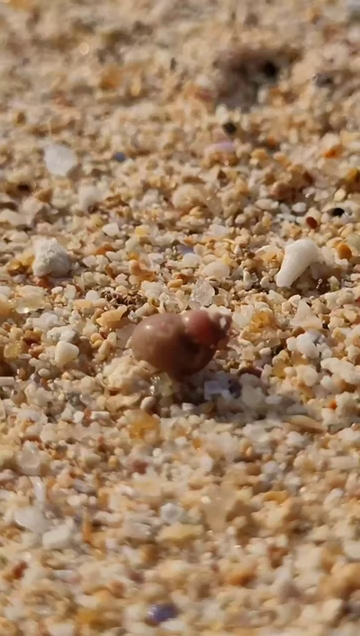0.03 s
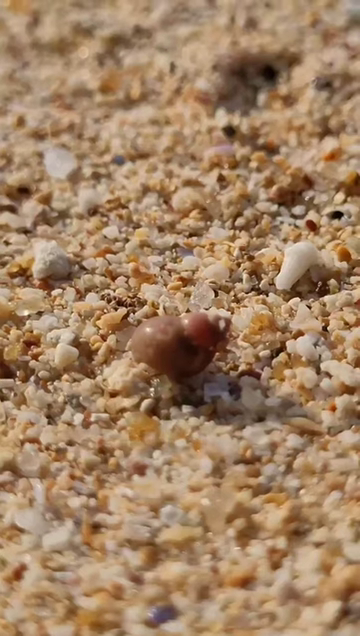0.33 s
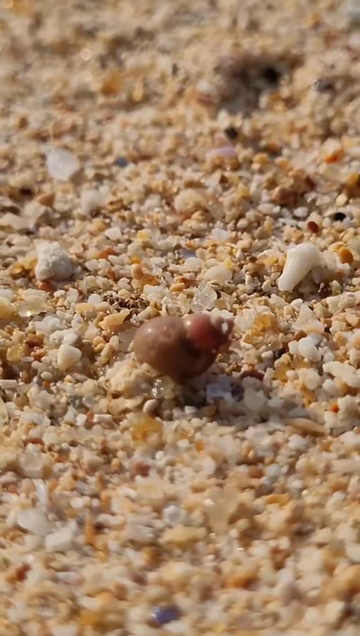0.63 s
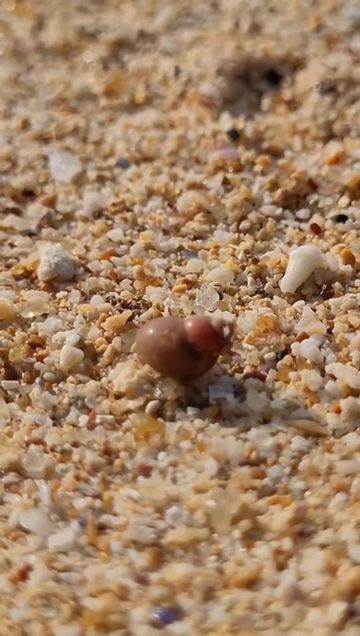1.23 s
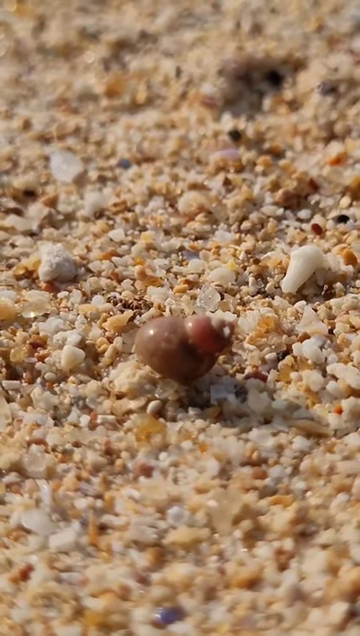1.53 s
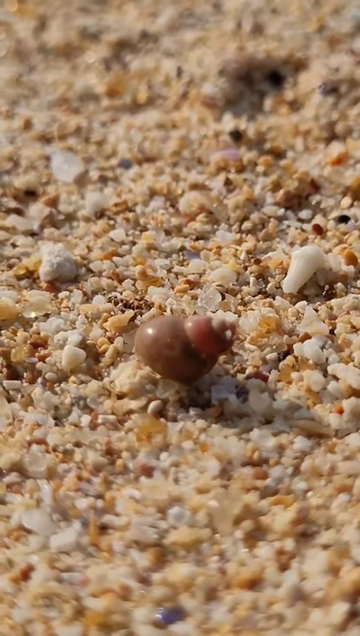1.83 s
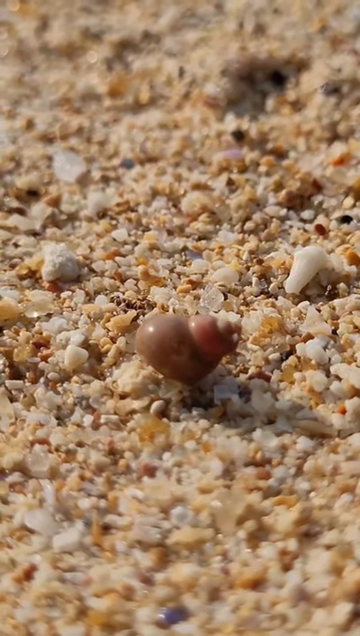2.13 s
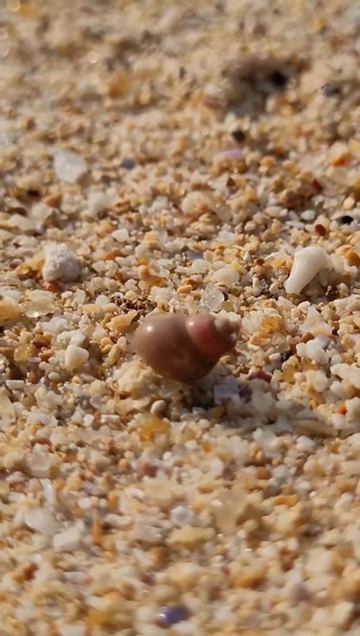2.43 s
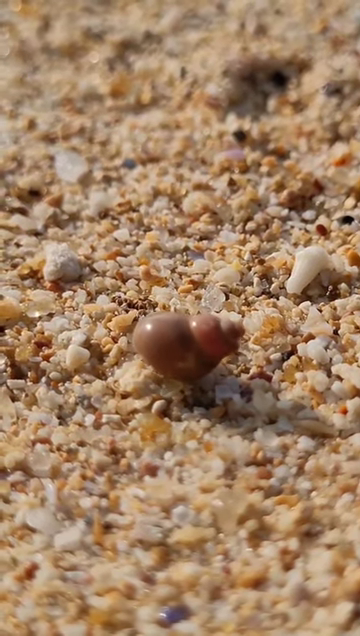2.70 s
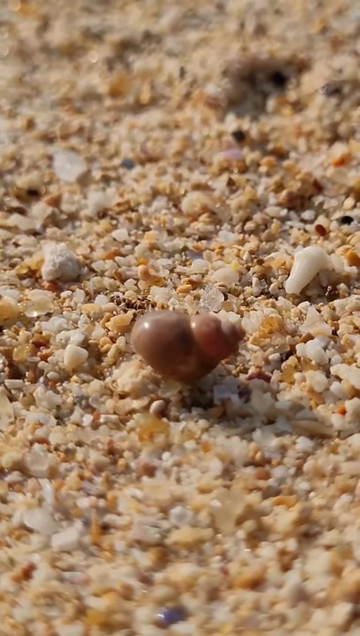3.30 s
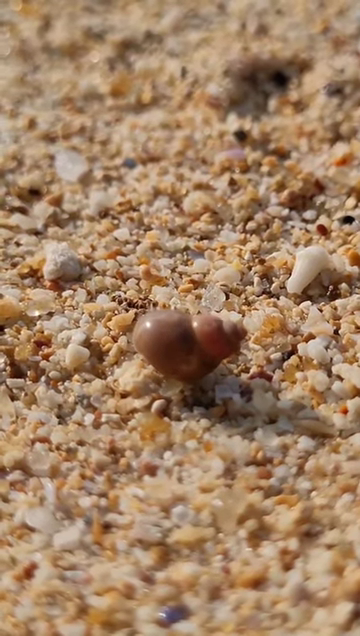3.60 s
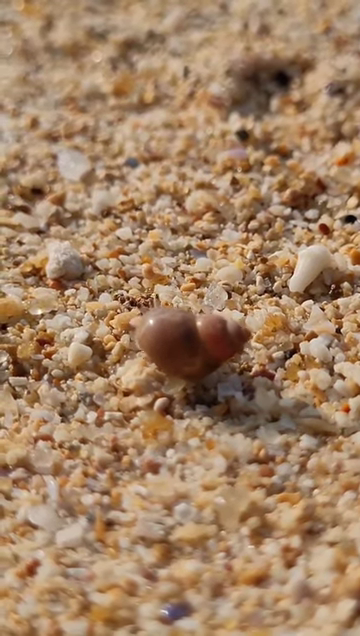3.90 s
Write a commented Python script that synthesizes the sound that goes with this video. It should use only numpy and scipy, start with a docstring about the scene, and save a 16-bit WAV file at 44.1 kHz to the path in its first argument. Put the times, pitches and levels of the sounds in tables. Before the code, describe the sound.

Gusty wind rumbling and buffeting the microphone on a beach, with faint distant surf.

```python
"""A hard draught buffets the left ear, then gives way to a gusty breeze on a beach.
The wind is heard close to the sand, through the two ports of a small microphone: each passing
eddy changes the pressure on a port, so the air rumbles, thuds, hoots and flaps as it rises and falls.
Distant surf washes and hisses behind it, and something small ticks once."""
import sys
import numpy as np
from scipy import signal
from scipy.fft import rfft, irfft, next_fast_len
from scipy.io import wavfile
from scipy.ndimage import uniform_filter1d

SR = 44100
rng = np.random.default_rng(int(sys.argv[2]) if len(sys.argv) > 2 else 0)


def unload_wav(signal):
    """Save mono or channel-first audio to the path in sys.argv[1] as 16-bit WAV at rate SR, clipped to [-1, 1]."""
    wavfile.write(
        sys.argv[1],
        SR,
        np.round(np.clip(np.atleast_2d(signal).T, -1, 1) * 32767).astype(np.int16),
    )


N = 174195

# Levels in all tables are relative.
# Strength of the breeze: t/s, level/dB
BREEZE_STRENGTH = [(.19, -33), (.255, -31), (.29, -23), (.35, -29), (.5, -30), (.55, -25), (.62, -31),
                   (.78, -28), (.85, -31), (.92, -27), (1.03, -30), (1.25, -28), (1.38, -31), (1.55, -29),
                   (1.7, -35), (1.95, -36.5), (2.05, -30), (2.2, -30.5), (2.3, -33), (2.41, -31),
                   (2.57, -35.5), (2.72, -31), (2.88, -31), (3.04, -28.5), (3.14, -25), (3.22, -29),
                   (3.46, -26.5), (3.52, -31.5), (3.7, -29), (3.77, -34), (3.85, -31)]
# Spectrum of its turbulence: f/Hz, level/dB
BREEZE_SPECTRUM = [(20, -23), (32, -19), (52, 6.5), (85, -1.5), (130, 2.5), (190, -4), (270, 0),
                   (410, -2.5), (600, -7.5), (800, -17.5), (1200, -31), (2000, -46), (3200, -56.5),
                   (6000, -91)]
# Small eddies against large ones: t/s, level/dB
SMALL_EDDY_BALANCE = [(.2, 0.5), (.9, 2), (1.24, 4), (1.45, 2.5), (1.9, 1.5), (2.05, 4.5), (2.42, -1.5),
                      (2.6, 2.5), (3.1, 8), (3.33, 9.5), (3.66, 4), (3.92, 10)]
# Spectrum of a sharp little eddy: f/Hz, level/dB
FLICK_SPECTRUM = [(120, -14.5), (400, 10), (750, -3.5), (1200, -15.5), (2000, -26), (3200, -44),
                  (6000, -68.5)]
# Strength of the draught: t/s, level/dB
DRAUGHT_STRENGTH = [(.19, -17), (.25, -14), (.33, -13), (.372, -15), (.382, -22), (.41, -15), (.45, -14.5),
                    (.505, -16), (.56, -12.5), (.63, -15), (.71, -15.5), (.75, -14), (.812, -14),
                    (.84, -40)]
# Spectrum of its turbulence: f/Hz, level/dB
DRAUGHT_SPECTRUM = [(20, -35), (40, -20), (60, -1), (120, 0.5), (240, 3), (340, -2.5), (560, -14),
                    (850, -25), (1350, -47), (2500, -48), (5000, -85)]
# Swell of the surf's hiss: t/s, level/dB
SURF_SWELL = [(.2, -59), (.55, -60.5), (.8, -61.5), (.95, -63.5), (1.15, -63), (1.4, -64), (1.85, -66),
              (2.1, -63), (2.45, -62.5), (2.75, -60), (3.0, -59.5), (3.3, -63), (3.92, -62.5)]
# Spectrum of the surf: f/Hz, level/dB
SURF_SPECTRUM = [(60, 28.5), (300, 18.5), (700, 0.5), (1300, 0), (2000, -6), (3100, -13.5), (3600, -11.5),
                 (4050, -8), (4700, -13.5), (5500, -12.5), (6400, -15.5), (7400, -14.5), (9800, -16.5),
                 (11000, -20), (12500, -15), (14500, -27)]
# Large eddies on the ports: t/s, crest level/dB, half length/s, left minus right/dB
THUD_EVENTS = [(.197, -26, .01, 20), (.548, -16, .014, 9), (.592, -22, .012, 18), (.737, -20, .014, 12),
               (.768, -23, .011, 16), (.806, -23, .01, 12), (1.078, -26, .009, 8), (1.158, -30, .014, 0),
               (1.335, -31, .016, 0), (1.466, -27, .014, 2), (1.535, -33, .016, -3), (1.907, -28, .007, -6),
               (2.054, -29, .009, -14), (2.16, -33, .018, -6), (2.402, -28, .01, -14),
               (2.425, -25, .012, 2), (2.632, -30, .02, -7), (2.708, -30, .014, -5), (2.779, -25, .011, -5),
               (2.845, -28, .008, 4), (2.913, -19.5, .009, 1), (3.015, -30, .009, -2), (3.08, -25, .011, 3),
               (3.106, -18.5, .01, -5), (3.14, -25, .011, 3), (3.335, -29, .022, 2), (3.45, -27, .018, -5),
               (3.67, -21.5, .01, 2)]
# Vortices across the ports: t/s, crest level/dB, half length/s, f/Hz, left minus right/dB
VORTEX_EVENTS = [(.228, -19, .008, 390, 22), (.244, -21, .008, 380, 22), (.268, -19, .012, 470, 12),
                 (.362, -20, .011, 320, 22), (.448, -25, .012, 430, 18), (.545, -17, .01, 280, 6),
                 (.574, -17, .011, 370, 18), (.614, -24, .007, 520, 18), (.655, -21, .011, 270, 20),
                 (.68, -20, .009, 300, 22), (.802, -20, .013, 245, 20), (.936, -24, .008, 240, -8),
                 (1.178, -23, .008, 330, -3), (1.24, -26, .012, 580, 0), (1.283, -22, .008, 430, -4),
                 (1.316, -18, .009, 255, -4), (1.338, -24, .008, 270, -3), (1.42, -24, .008, 225, -4),
                 (1.456, -22, .016, 280, 2), (1.906, -21.5, .005, 310, -1), (2.056, -23.5, .01, 490, -4),
                 (2.152, -24, .013, 240, -2), (2.398, -23, .011, 450, -3), (2.775, -20, .007, 270, -3),
                 (2.843, -20, .008, 380, 2), (2.911, -16.5, .007, 330, 0), (2.957, -18, .007, 365, 0),
                 (2.98, -13, .007, 400, 1), (3.083, -18, .009, 315, 0), (3.114, -14.5, .011, 340, -1),
                 (3.14, -19.5, .008, 480, -2), (3.198, -16.5, .008, 270, -7), (3.238, -17.5, .009, 300, -3),
                 (3.292, -15.5, .009, 520, -1), (3.315, -23, .009, 540, -5), (3.379, -17, .009, 470, 1),
                 (3.438, -19, .009, 420, -1), (3.474, -22, .007, 490, 3), (3.609, -20.5, .008, 420, -4),
                 (3.663, -20.5, .011, 330, -4), (3.823, -25, .007, 370, -3)]
# Flaps of air: t/s, crest level/dB, left minus right/dB
FLAP_EVENTS = [(.228, -22, 14), (.449, -22, 14), (.615, -22, 14), (2.13, -27, 2), (2.27, -27, 3),
               (2.402, -24, -4), (2.774, -22, 0), (2.908, -19, 1), (3.125, -19, 0), (3.195, -21, -2),
               (3.31, -22, -2), (3.359, -24, 2), (3.472, -23, 2), (3.54, -25, 3), (3.61, -24, 1)]
# Spectrum of the tick: f/Hz, level/dB
TICK_SPECTRUM = [(500, -14), (2200, -1), (4000, 0), (6500, -6), (10000, -6), (12000, -18)]


def undb(db):
    """Amplitude ratio: tenfold for every 20 dB."""
    return 10 ** (np.asarray(db) / 20)


def curve(rows):
    """Linear interpolation through (t/s, value) rows."""
    return np.interp(np.arange(N) / SR, *np.array(rows).T)


def pan(db):
    """Left and right gains for a level difference, left minus right."""
    return undb(np.array([[db], [-db]]) / 2)


def unit(x):
    """Normalisation to rms 1."""
    return x / np.sqrt(np.mean(x ** 2, axis=-1, keepdims=True))


def colour(x, spectrum):
    """Spectral shaping by (f/Hz, level/dB) rows, falling 12 dB an octave below the first."""
    hz, db = np.array(spectrum).T
    size = 2 * next_fast_len(N)
    f = np.maximum(np.fft.rfftfreq(size, 1 / SR), 1)
    gain = undb(np.interp(np.log(f), np.log(hz), db)) * np.minimum(f / hz[0], 1) ** 2
    return irfft(rfft(x, size) * gain)[..., :N]


def split(x, hz):
    """Complementary filtering: the parts below and above a frequency."""
    low = signal.sosfiltfilt(signal.butter(2, hz, fs=SR, output="sos"), x)
    return low, x - low


def wander(rate_hz):
    """Smooth random modulation of rms 1, its extremes rounded off."""
    step = int(SR / rate_hz)
    held = np.repeat(rng.standard_normal(N // step + 2), step)
    smooth = uniform_filter1d(uniform_filter1d(held, step), step)[:N]
    return unit(np.tanh(smooth / 2))


def burst(hz, width, half_s, count=8192):
    """A wave packet on each port: noise of bandwidth width * hz in a Gaussian window, crest rms near 1."""
    f = np.maximum(np.fft.rfftfreq(count, 1 / SR), 1)
    resonance = 1 / np.hypot(1, (f / hz - hz / f) / width)
    rolloff = 1 + (f / (1.876 * hz)) ** 5
    band = irfft(rfft(rng.standard_normal((2, count))) * resonance / rolloff)
    window = np.exp(-((np.arange(count) - count // 2) / SR / half_s) ** 2)
    return unit(band * window) * np.sqrt(np.mean(window ** 2))


def add(out, sound, at):
    """Superposition of a short sound, centred on a time."""
    first = int(at * SR) - sound.shape[1] // 2
    out[:, first:first + sound.shape[1]] += sound[:, :N - first]


def turbulence(spectrum, eddies_per_s, eddy_share, flutter_hz, crackle_db, crossover_hz=599):
    """Turbulent pressure on a port, as large and small eddies; intermittency bunches the small ones."""
    hits = (rng.random(N) < eddies_per_s / SR) * rng.standard_normal(N)
    churn = rng.standard_normal(N)
    pressure = np.sqrt(eddy_share) * unit(hits) + np.sqrt(1 - eddy_share) * churn
    flutter = undb(1.5 * wander(flutter_hz))
    large, small = split(unit(colour(pressure * flutter, spectrum)), crossover_hz)
    return large, small * unit(undb(crackle_db * wander(220)))


def flicks(per_s=45, spread_db=5.5):
    """Shot noise: lone, sharp eddies kick one port at random times, with random size and sign."""
    chance, strength, polarity = rng.random((3, N))
    kicks = undb(spread_db * np.sqrt(12) * strength) * np.sign(polarity - .5)
    return unit(colour((chance < per_s / SR) * kicks, FLICK_SPECTRUM))


def breeze(left_cut_hz=270):
    """Shared gusts modulate independent turbulence on each port; the left is thin, the right rumbles."""
    gusts_db = curve(BREEZE_STRENGTH) + 1.05 * wander(45)
    ports = [turbulence(BREEZE_SPECTRUM, eddies_per_s=300, eddy_share=.54, flutter_hz=120, crackle_db=7)
             for _ in range(2)]
    large, small = np.stack(ports, axis=1)
    bass_cut = signal.butter(4, left_cut_hz, "highpass", fs=SR, output="sos")
    large[0] = signal.sosfilt(bass_cut, large[0])
    crackle = undb(-.5) * small + undb(-14) * np.stack([flicks(), flicks()])
    crackle *= undb(curve(SMALL_EDDY_BALANCE))
    return undb(gusts_db + 2.5) * (large * pan(.5) + crackle * pan(4))


def draught():
    """Dense turbulent pressure buffets the left port alone, then stops abruptly."""
    large, small = turbulence(DRAUGHT_SPECTRUM, eddies_per_s=1200, eddy_share=.4,
                              flutter_hz=110, crackle_db=4)
    blowing = np.arange(N) / SR < DRAUGHT_STRENGTH[-1][0]
    left = (large + small) * undb(curve(DRAUGHT_STRENGTH) + 1.5) * blowing
    return np.stack([left, np.zeros(N)])


def surf(hiss_hz=3500, foam_hz=7400):
    """Uncorrelated noise left and right makes a wide wash; its top fizzes more as each wave spreads."""
    wash = colour(rng.standard_normal((2, N)), SURF_SPECTRUM)
    _, hiss = split(wash, hiss_hz)
    body, foam = split(wash / np.std(hiss), foam_hz)
    swell_db = curve(SURF_SWELL)
    fizz = undb(-5 + .082 * (swell_db - swell_db.min()))
    return (body + foam * fizz) * undb(swell_db + 2.5 + .37 * wander(4.86)) * pan(-2.15)


def thuds():
    """Large eddies change the pressure slowly: dull, low pushes of a cycle or two."""
    out = np.zeros((2, N))
    for at, db, half_s, side_db in THUD_EVENTS:
        add(out, burst(hz=103, width=1, half_s=half_s) * undb(db + 2) * pan(side_db), at)
    return out


def vortices():
    """Vortices hoot briefly across the ports; a narrow bandwidth gives each a hollow pitch."""
    out = np.zeros((2, N))
    for at, db, half_s, hz, side_db in VORTEX_EVENTS:
        add(out, burst(hz, width=.3, half_s=half_s) * undb(db - .5) * pan(side_db), at)
    return out


def flaps():
    """Air flaps sharply on the ports; so short a pulse has a broad spectrum."""
    out = np.zeros((2, N))
    for at, db, side_db in FLAP_EVENTS:
        add(out, burst(hz=668, width=.75, half_s=.0012) * undb(db) * pan(side_db), at)
    return out


def tick(at=1.9545, decay_s=.00072):
    """One tiny dry click: a broadband transient with exponential decay."""
    age = np.arange(N) / SR - at
    crack = unit(colour(rng.standard_normal((2, N)), TICK_SPECTRUM))
    envelope = (age >= 0) * np.exp(-np.abs(age) / decay_s)
    return crack * envelope * undb(-39) * pan(-1)


def scene():
    """Superposition: the pressures of wind, surf and tick add."""
    wind = breeze() + vortices() + thuds() + flaps() + draught()
    return wind + surf() + tick()


def record(dry, start_s=.193, rise_s=.00006, top_hz=14550):
    """The sound cuts in; soft saturation rounds its peaks and a low-pass filter limits its bandwidth."""
    gate = np.clip((np.arange(N) / SR - start_s) / rise_s, 0, 1)
    saturated = dry / (1 + dry ** 6) ** (1 / 6)
    lowpass = signal.ellip(10, .2, 80, top_hz, fs=SR, output="sos")
    return signal.sosfilt(lowpass, saturated * gate)


dry = scene()
out = record(dry)
unload_wav(out)
```